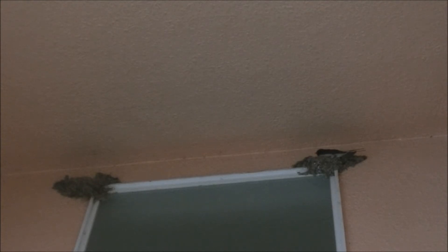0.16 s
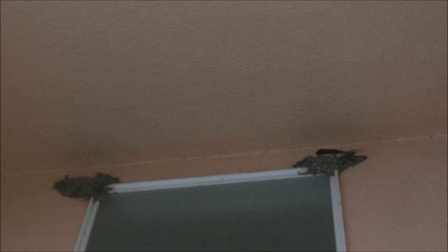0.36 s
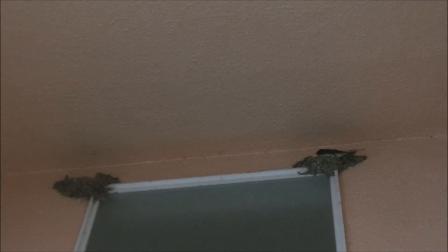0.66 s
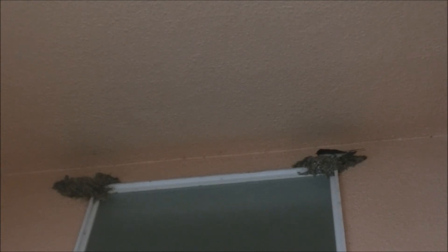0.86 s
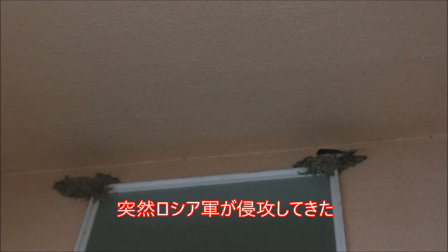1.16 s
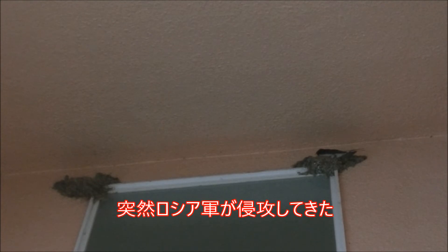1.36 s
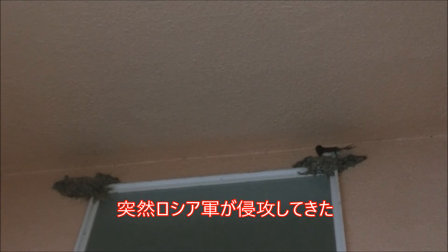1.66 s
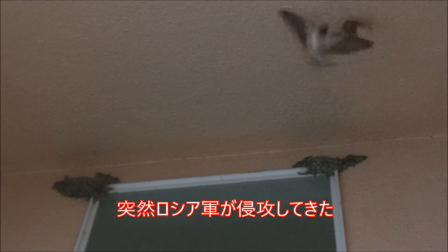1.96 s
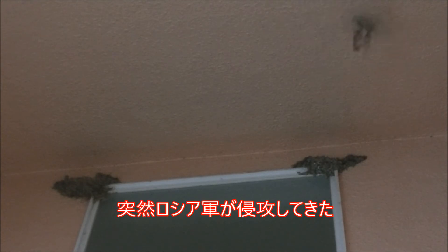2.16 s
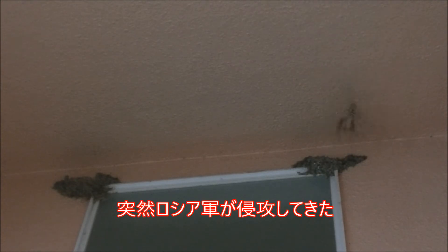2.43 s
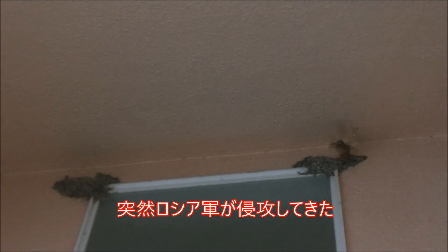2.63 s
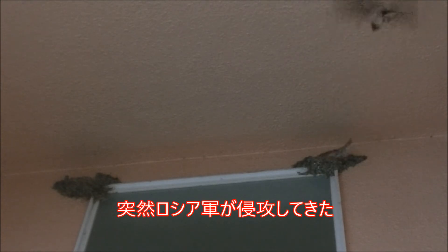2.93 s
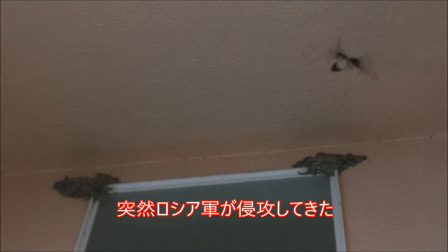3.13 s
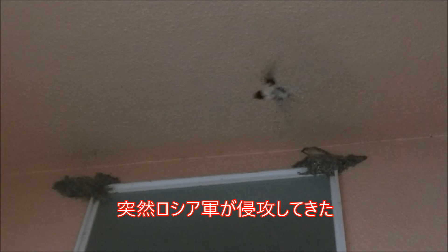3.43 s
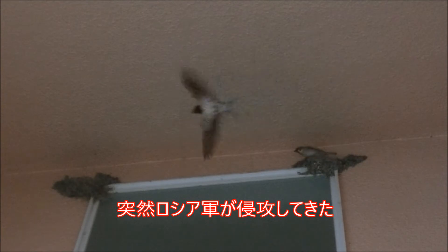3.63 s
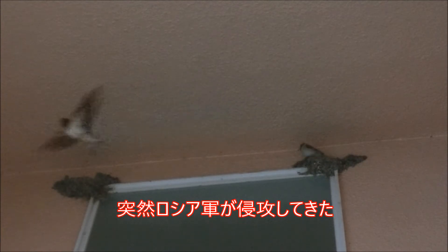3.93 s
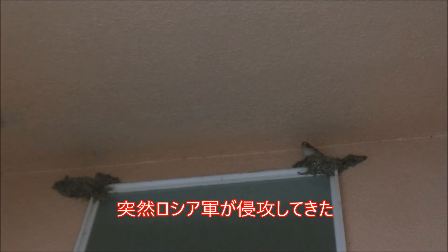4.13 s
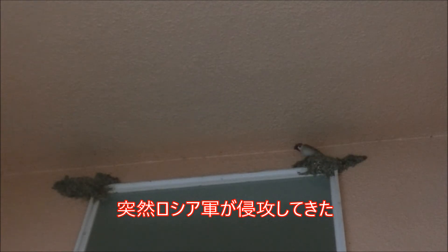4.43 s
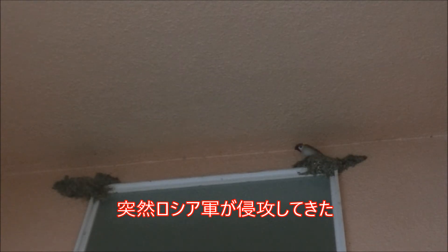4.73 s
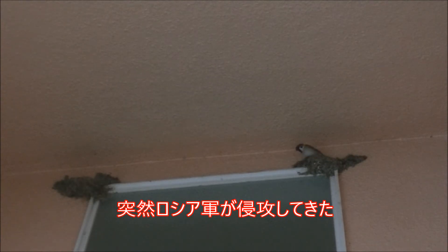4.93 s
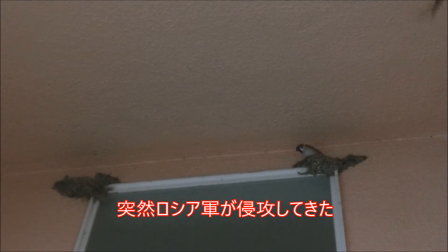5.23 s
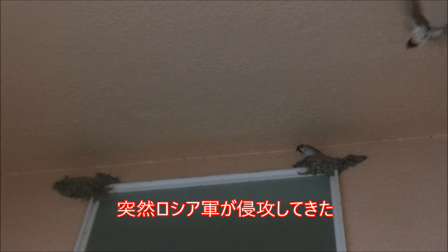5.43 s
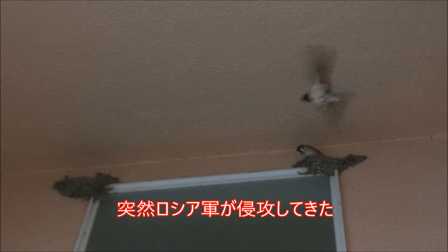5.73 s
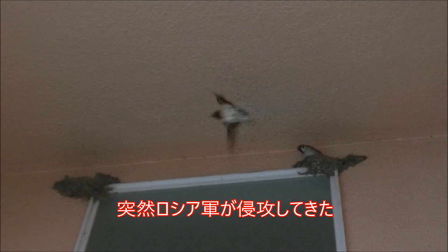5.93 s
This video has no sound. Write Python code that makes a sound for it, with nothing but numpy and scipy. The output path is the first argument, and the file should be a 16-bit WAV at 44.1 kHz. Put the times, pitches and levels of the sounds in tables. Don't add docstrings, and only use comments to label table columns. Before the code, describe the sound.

Stereo microphone a few steps from mud nests in a small, reflective porch. Road roar fades behind; feathers brush and air thumps as a swallow brakes to land, amid overlapping squeaky, raspy whistles, claw scrapes and sharp beak clicks. Single upward chirps come later, growing weaker. Air hiss swells faintly, something cracks sharply nearby, and a short, softer bird quarrel closes over the distant traffic.

```python
import sys
import numpy as np
from scipy import signal
from scipy.fft import rfft, irfft
from scipy.io import wavfile
from scipy.ndimage import uniform_filter1d, map_coordinates

SR = 44100
rng = np.random.default_rng(int(sys.argv[2]) if len(sys.argv) > 2 else 0)


def attenuation_scalar(level_db):
    decades = np.asarray(level_db, float) / 20
    return 10 ** decades


def bounce(signal):
    frames = np.transpose(np.atleast_2d(signal))
    limited = np.clip(frames, -1, 1)
    pcm = np.round(limited * 32767).astype(np.int16)
    wavfile.write(sys.argv[1], SR, pcm)


N = 268128


def unit(x):
    return x / np.sqrt(np.mean(x ** 2) + 1e-20)


def along(points, hz):
    f, v = np.transpose(points)
    return np.interp(np.log(hz + 1), np.log(f + 1), v)


def curves(rows):
    s, *cols = np.transpose(rows)
    return [np.interp(np.arange(N) / SR, s, c) for c in cols]


def bumps(rows):
    t = np.arange(N) / SR
    return sum(db * np.exp(-((t - s) / half) ** 2) for s, half, db in rows)


def wobble(rate, size=N):
    knots = rng.standard_normal(int(size * rate / SR) + 4)
    return map_coordinates(knots, [np.arange(size) * rate / SR])


def rush(spectrum, patchy_db):
    # frequency in Hz, correlation from 0 to 1.
    likeness = [(30, 0.046), (70, .15), (130, 0.77), (300, 0.96), (1000, 0.96), (3000, 0.85), (8000, 0.96),
                (11200, 0.99), (13000, 0.97)]
    z = signal.stft(rng.standard_normal((2, N + 512)), nperseg=512)[2]
    field = uniform_filter1d(rng.standard_normal(z.shape[1:]), 6, 0)
    field = uniform_filter1d(field, 14, 1)
    pair = signal.istft(z * attenuation_scalar(patchy_db * unit(field)), nperseg=512)[1][:, :N]
    hz = np.fft.rfftfreq(N, 1 / SR)
    turn = np.arccos(np.clip(along(likeness, hz), -1, 1)) / 2
    shaped = rfft(pair) * attenuation_scalar(along(spectrum, hz))
    mid, side = irfft(shaped * [np.cos(turn), np.sin(turn)], N)
    return unit(np.array([mid + side, mid - side]))


def ticks(rows):
    t, out = np.arange(SR // 20) / SR, []
    for s, peak_db, hz, contact_s, width in rows:
        grains = rng.standard_normal(len(t)) * np.exp(-t / max(contact_s, 1e-4))
        ratio = max(width, 1.05)
        edges = [hz / ratio, min(hz * ratio, .45 * SR)]
        click = signal.sosfilt(signal.butter(2, edges, "band", fs=SR, output="sos"), grains)
        out.append((s, attenuation_scalar(peak_db + 1.5) * click / np.abs(click).max()))
    return out


def porch(sounds, wet_db, spread):
    # frequency in Hz, time to fall 60 dB in seconds.
    decay = [(300, 0.32), (3000, 0.39), (6000, 0.28), (12000, 0.2)]
    # delay in seconds, level in dB.
    echoes = [
        (.0015, -7),
        (.0034, -6.5),
        (.008, -12.5),
        (0.0182, -11),
    ]
    out = np.zeros((2, N + 2 * SR))
    for s, x in sounds:
        hz, t, z = signal.stft(rng.standard_normal((2, SR // 2)), SR, nperseg=256)
        fall = attenuation_scalar(-60 * t / along(decay, hz)[:, None])
        tail = signal.istft(z * fall, SR, nperseg=256)[1]
        tail[:, :round(.004 * SR)] = 0
        mid, side = attenuation_scalar(wet_db) * tail / np.linalg.norm(tail[0])
        mid[0] = 1
        for (delay, db), shift in zip(echoes, rng.uniform(.9, 1.1, len(echoes))):
            mid[round(delay * shift * SR)] += attenuation_scalar(db)
        y = signal.fftconvolve(x[None], [mid + spread * side, mid - spread * side], axes=1)
        out[:, round(s * SR):][:, :y.shape[1]] += y
    return out[:, :N]


def town_rumble():
    # frequency in Hz, level in dB per Hz.
    spectrum = [(13, -58), (22, -9.5), (91, -14.5), (228, -4), (266, -3), (318, 0.5), (555, 3.5), (663, 3),
                (968, 0), (2210, -9.5), (3150, -12), (4500, -17), (5850, -26.5), (9900, -120)]
    return attenuation_scalar(-55.5) * rush(spectrum, patchy_db=0.34)


def air_hiss():
    # frequency in Hz, level in dB per Hz.
    spectrum = [(1500, -29), (2500, -40), (4000, -8), (5100, -2.5), (8000, -3), (11000, -5.5),
                (14000, -8.5), (15800, -11), (17000, -12)]
    flybys = [(2.65, 0.63, 2.7), (5.02, 0.55, 2.6)]
    hiss_db = -66.5 + bumps(flybys)
    flicker_db = .6 * wobble(30)
    return attenuation_scalar(hiss_db + flicker_db) * rush(spectrum, patchy_db=1.3)


def passing_car():
    # time in seconds, level in dB.
    passing = [(0, -46), (.55, -46), (.9, -49.5), (1.2, -52), (1.8, -53), (2.4, -52.5), (2.75, -55.5),
               (3.2, -58), (4, -61), (4.5, -58.5), (5.05, -55.5), (5.4, -58), (5.8, -54.5), (6.08, -55.5)]
    # frequency in Hz, level in dB per Hz.
    spectrum = [(180, -34), (300, -14.5), (628, -7), (995, -4), (1540, -11.5), (1780, -11), (4080, -30),
                (4970, -29.5), (7000, -44.5), (9100, -73), (15400, -120)]
    car_db, = curves(passing)
    return attenuation_scalar(car_db + 0.91 * wobble(4.51)) * rush(spectrum, patchy_db=0.7)


def twig_snap():
    # start in seconds, peak in dB, centre in Hz, contact time in seconds, band width as a ratio.
    cracks = [
        (5.168, -28.5, 7500, 0.000091, 1.6),
        (5.17, -44, 5470, 0.0005, 1.1),
    ]
    return porch(ticks(cracks), wet_db=-4.5, spread=0.23)


def wings():
    # time in seconds, feather rustle in dB.
    effort = [(1.27, -80), (1.33, -66), (1.43, -67), (1.56, -61.5), (1.66, -51.5), (1.73, -68.5),
              (1.82, -70), (1.87, -53.5), (1.95, -50), (2.07, -53.5), (2.12, -44), (2.16, -51),
              (2.22, -48.5), (2.3, -51), (2.4, -47), (2.47, -55), (2.68, -58.5), (3.15, -75)]
    # centre in seconds, half length in seconds, rise in dB.
    beats = [
        (1.33, 0.026, 13),
        (1.66, .03, -3.5),
        (1.95, 0.076, 4.5),
        (2.12, .03, -3.5),
        (2.24, 0.13, 5.5),
        (2.56, .03, 1.5),
    ]
    # time in seconds, deep flutter in dB.
    swoop = [
        (2.25, -72),
        (2.31, -55),
        (2.41, -57),
        (2.47, -72),
    ]
    # frequency in Hz, level in dB per Hz.
    feathers = [(500, -32), (1200, 9), (3000, 0.5), (7000, -2.5), (12000, -8), (15500, -20), (17000, -40)]
    air = [(130, -27), (300, -6), (470, -3), (535, 6), (640, -0.5), (900, 1), (1500, -35), (2500, -31.5)]
    deep = [(120, -18), (210, -16), (268, 5), (330, -2), (500, -47)]
    rustle_db, = curves(effort)
    flutter_db, = curves(swoop)
    thump_db = -49 + (rustle_db + 47) + bumps(beats)
    t = np.arange(N) / SR
    aloft = np.clip(np.minimum(t - effort[0][0], effort[-1][0] - t) / 0.04, 0, 1)
    stroke_db = 1.8 * wobble(40)
    rustle = attenuation_scalar(rustle_db + stroke_db + 1.9 * wobble(300)) * rush(feathers, patchy_db=1.8)
    thump = attenuation_scalar(thump_db) * rush(air, patchy_db=-2.5)
    flutter = attenuation_scalar(flutter_db) * rush(deep, patchy_db=2.5)
    return aloft * (rustle + attenuation_scalar(stroke_db) * (thump + flutter))


def beaks_and_claws():
    # start in seconds, peak in dB, centre in Hz.
    taps = [(2.213, -33, 8050), (2.605, -35, 7100), (2.628, -27, 7600), (2.799, -36, 8700),
            (2.808, -45, 12500), (2.888, -38, 8560), (3.053, -45, 7000), (3.181, -46, 8500),
            (3.453, -45.5, 7500), (3.8, -52, 8500), (5.04, -52, 13000), (5.496, -42, 8300),
            (5.617, -39.5, 6500), (5.765, -51.5, 9500)]
    scrapes = [(1.316, -53, 8000), (1.423, -51, 8000), (1.46, -60, 11000), (1.497, -48, 8000),
               (1.535, -47, 11000), (1.596, -50, 11000), (1.865, -46, 8000), (2.041, -35, 9000),
               (2.636, -36.5, 12000), (5.009, -48, 9900)]
    shuffles = [
        (2.045, -42.5, 10900),
        (3.513, -51.5, 6900),
        (3.815, -65, 7050),
        (4.706, -51.5, 5470),
    ]
    # rows, contact time in seconds, band width as a ratio
    kinds = [(taps, 0.00048, 1.32), (scrapes, 0.0044, 2), (shuffles, .013, 1.27)]
    rows = [(*row, contact_s, width) for touches, contact_s, width in kinds for row in touches]
    return porch(ticks(rows), wet_db=0.5, spread=0.076)


def whistle(shape, stroke, third_db, rasp):
    share, *cols = np.transpose(shape)
    _, length, first_hz, second_hz, db = stroke
    t = np.arange(0, length, 1 / SR)
    way, swell_db, second_db = [np.interp(t / length, share, c) for c in cols]
    hz = first_hz + way * (second_hz - first_hz)
    drift, beads, haze = [rasp * wobble(rate, size=SR // 4)[:len(t)] for rate in (400, 300, 2500)]
    glide = uniform_filter1d(hz, size=150, mode="nearest")
    turn = 2 * np.pi * np.cumsum(glide * (1 + .04 * drift)) / SR
    tone = np.sin(turn) + attenuation_scalar(second_db) * np.sin(2 * turn) + attenuation_scalar(third_db) * np.sin(3 * turn)
    fade = np.clip(np.minimum(t, t[-1] - t) / .002, 0, 1)
    return np.sqrt(2) * attenuation_scalar(db + swell_db + 9 * beads) * (1 + haze) * fade * tone


def swallow_song():
    # share of length, share of the way from first to second pitch,
    # level in dB, second overtone in dB.
    chip = [(0, 0.12, -8, -9), (.45, .2, 0, -6), (.75, .5, 1, -15), (1, 0.94, -12, 2)]
    arch = [(0, .55, -11, -25), (.2, 1, -14, -22), (.46, 1, -6.5, -31), (.64, .81, 1, -15.5),
            (.85, .59, -6, 8), (1, 0.054, -10, -2)]
    lead = [(0, 1, -3, -22), (.1, .52, 1, -11), (.25, 0.066, -7.5, -3), (.42, .08, -10, -20),
            (.57, .47, -3, -9), (.8, .28, -3, -19), (1, 0, 4.5, -7)]
    fall = [(0, 0, -9, -17), (.1, .1, -1, -25), (.4, .3, 1, -28), (.68, .57, -1, -26), (1, 0.93, -9.5, -31)]
    rise = [(0, 0.029, -2.5, -17), (.33, .1, 0, -20), (.65, .58, -3, -18), (.92, 0.91, -2, -29),
            (1, 0.87, -9, -25)]
    hook = [(0, 0.026, -16, -30), (.4, .75, 1, -30), (.62, 1, -1, -30), (1, .7, -1, -33)]
    yelp = [(0, 0, -9, -7), (.37, 1, 1, -6), (.66, .58, 1, -27), (1, 0.494, -6, -18)]
    slide = [(0, 0, 1.5, -23), (.4, .4, 1, -22), (1, 1, -1.5, -30)]
    croak = [(0, 0, 3, -7), (.5, 0.374, 3.5, -15), (1, 1, -1, -5)]
    squawk = [(0, 0.027, 2, -1), (.5, .25, 0, 6.5), (1, 1, 1, 1.5)]
    sigh = [(0, 0, -2, -5), (.2, .12, 2, -16.5), (.7, 0.53, -1, -30), (1, 0.93, -12, -24)]
    bend = [(0, 0.0091, -6, -28), (.3, .1, -3.5, -28), (.7, .6, 0, -30), (1, 1, 1, -30)]
    bow = [(0, .66, -9, -25), (.17, 0.99, -4.5, -23), (.45, 1, -4, -11), (.7, .7, 0, -6.5),
           (.9, .34, -7.5, 0.5), (1, 0.011, -9.5, 13.5)]
    # start in seconds, length in seconds, first pitch in Hz,
    # second pitch in Hz, level in dB.
    chips = [
        (1.452, .027, 4614, 2740, -38.5),
        (1.973, .028, 4350, 3280, -37.5),
    ]
    arches = [(1.493, .073, 1390, 2770, -30)]
    leads = [
        (2.157, .097, 4800, 6280, -36),
        (2.35, .089, 4940, 6510, -36.5),
    ]
    falls = [
        (2.253, .035, 5036, 2583, -22.5),
        (2.437, .032, 4950, 3100, -31),
    ]
    rises = [(2.947, 0.059, 2746, 4820, -48.5), (3.296, .058, 2827, 5140, -50.5),
             (3.508, 0.048, 2840, 5240, -45.5), (3.791, .049, 2730, 5090, -46.5),
             (4.088, 0.046, 2830, 5050, -45.5)]
    hooks = [(2.977, .055, 2090, 3764, -38.5), (3.318, 0.053, 2830, 3700, -51),
             (3.54, 0.051, 3020, 3700, -46), (3.826, 0.0355, 3090, 3800, -52.5),
             (4.126, 0.033, 3190, 3850, -56)]
    yelps = [(5.597, 0.0354, 3395, 4800, -44)]
    slides = [(1.5, 0.012, 2070, 2650, -41), (2.972, 0.031, 1690, 1928, -45.5),
              (3.045, .053, 3550, 4400, -49.5), (3.515, .03, 1990, 2120, -51.5),
              (4.13, 0.014, 4950, 4970, -53), (5.575, 0.03, 4320, 4500, -52), (5.695, .06, 3550, 3470, -64)]
    croaks = [
        (2.112, 0.042, 2298, 2066, -44.5),
        (3.29, 0.022, 2790, 2870, -49.5),
        (5.62, 0.017, 2820, 2900, -66),
    ]
    squawks = [(2.93, .032, 2470, 2880, -54)]
    sighs = [(5.632, .052, 3700, 2815, -42)]
    bends = [(2.996, 0.035, 4880, 3980, -42), (3.352, 0.021, 5200, 4240, -57),
             (3.557, .029, 5180, 4120, -44), (3.84, .029, 5100, 4290, -51.5)]
    bows = [(2.02, .086, 1458, 2810, -33)]
    # shape, strokes, third overtone in dB, hoarseness from 0 to 1
    kinds = [
        (chip, chips, -23, .3), (arch, arches, -24, .33), (lead, leads, -40, .36),
        (fall, falls, -34, .33), (rise, rises, -23, .3), (hook, hooks, -40, .33),
        (yelp, yelps, -28, .36), (slide, slides, -38, .33), (croak, croaks, -19, .33),
        (squawk, squawks, -12, .4), (sigh, sighs, -30, .4), (bend, bends, -40, .3),
        (bow, bows, -22, .3)]
    song = []
    for shape, strokes, third_db, rasp in kinds:
        for stroke in strokes:
            song.append((stroke[0], whistle(shape, stroke, third_db, rasp)))
    return attenuation_scalar(-4.0) * porch(song, wet_db=-2.5, spread=0.15)


def scene():
    background = town_rumble() + air_hiss() + passing_car()
    birds = wings() + beaks_and_claws() + swallow_song()
    return (background + twig_snap() + birds) * attenuation_scalar([[-.15], [.15]])


def top_cut(x):
    return signal.sosfilt(signal.butter(12, 16520, fs=SR, output="sos"), x)


def record(dry):
    in_band = np.fft.rfftfreq(N, 1 / SR) < 15750
    kept = irfft(rfft(dry) * in_band, N)
    return top_cut(kept)


dry = scene()
out = record(dry)
bounce(out)
```